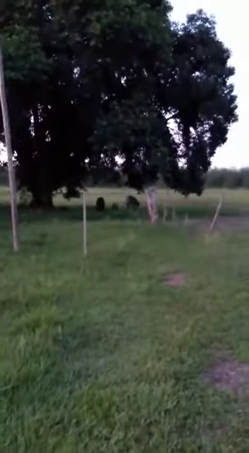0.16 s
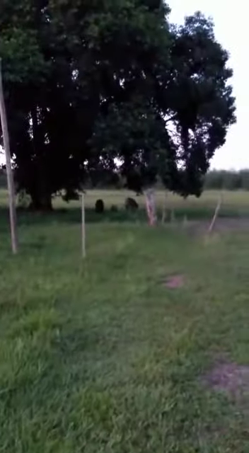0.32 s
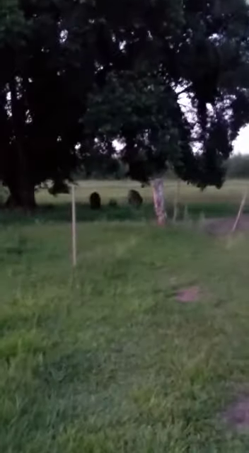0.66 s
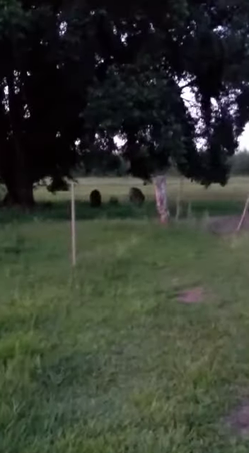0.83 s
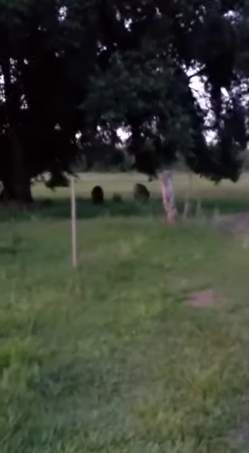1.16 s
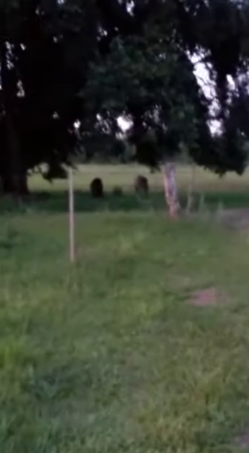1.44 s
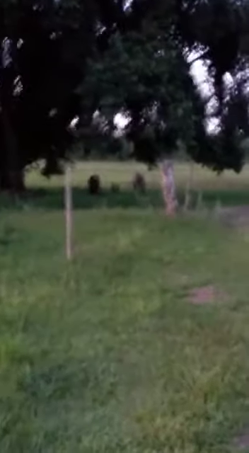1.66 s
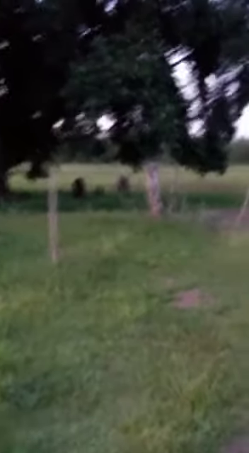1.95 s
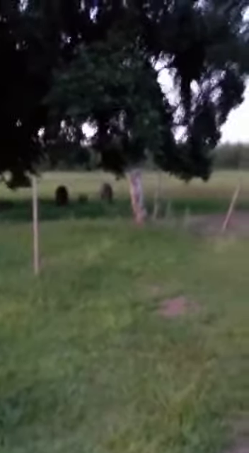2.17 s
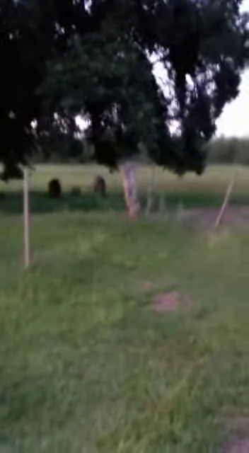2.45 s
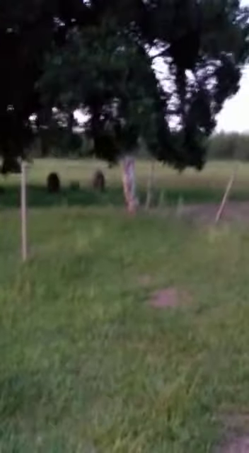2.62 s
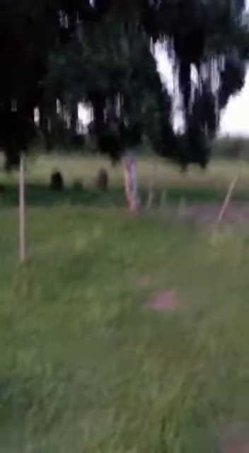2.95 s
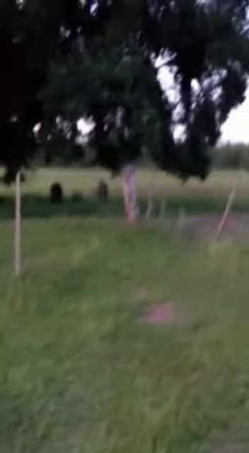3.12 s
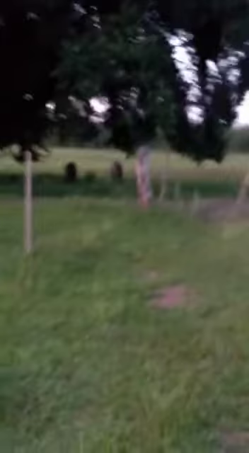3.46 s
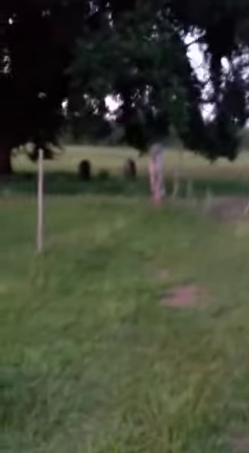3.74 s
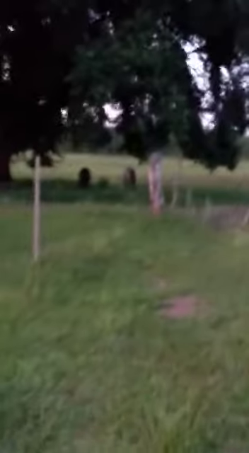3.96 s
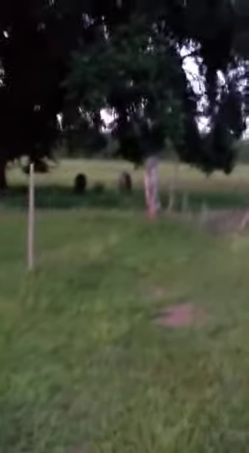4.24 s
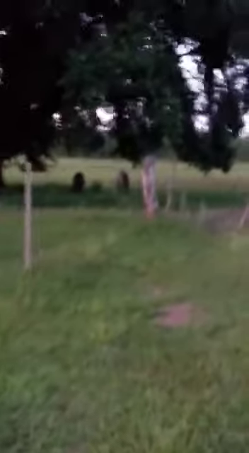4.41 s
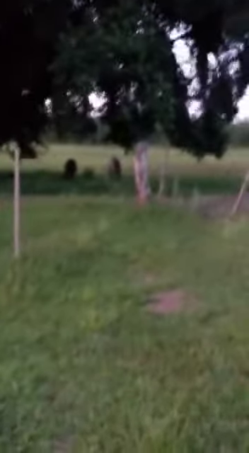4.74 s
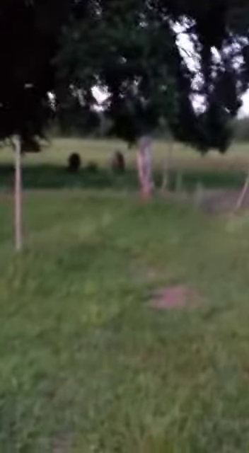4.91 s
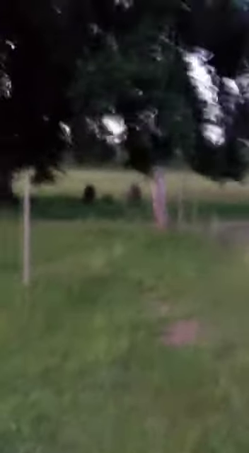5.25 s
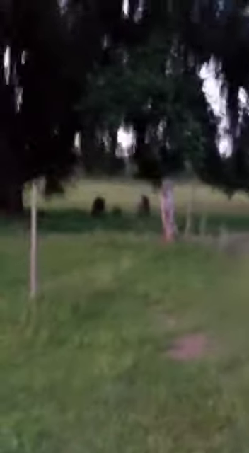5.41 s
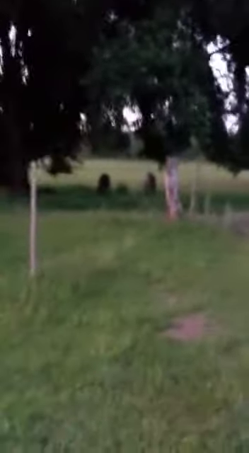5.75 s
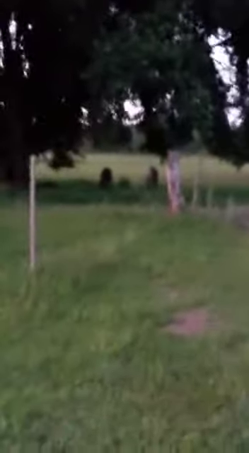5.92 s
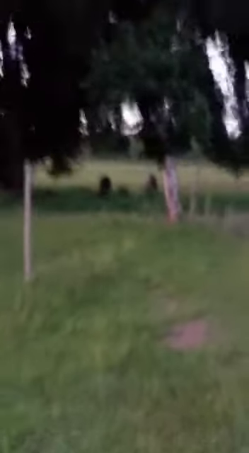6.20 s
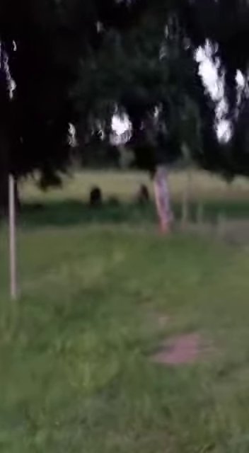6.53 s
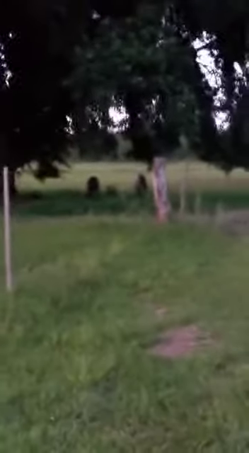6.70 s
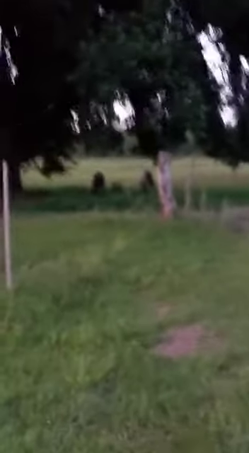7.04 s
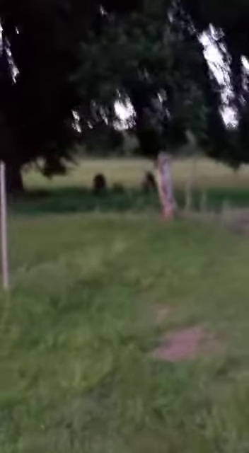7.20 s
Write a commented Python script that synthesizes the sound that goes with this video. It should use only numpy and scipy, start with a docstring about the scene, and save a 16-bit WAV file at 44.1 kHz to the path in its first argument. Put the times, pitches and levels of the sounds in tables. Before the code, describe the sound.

Many small birds in a large leafy tree chatter without pause, each note a very short, clear whistle sliding downward. Nearer chirps stand out at irregular moments over a faint blur of farther birds. Leaves smear the notes into brief airy tails. Beneath lie light hiss, a weak steady electronic whine on one side and a far engine's low, throbbing rumble. Outdoor pasture, handheld phone, wide stereo.

```python
"""Small birds in a big tree whistle quick falling notes over a pasture at dusk, with more birds further off.
Each note is a gliding near-sine; leaves scatter it as fading noise tails.
A far engine rumbles as throbbing resonant noise under a flickering hiss; the phone whines at a steady pitch.
The phone widens its two microphone ports by taking from each side a late copy of the other."""
import sys
import numpy as np
from scipy import signal
from scipy.fft import rfft, irfft, next_fast_len
from scipy.io import wavfile
from scipy.ndimage import uniform_filter1d

SR = 44100
rng = np.random.default_rng(int(sys.argv[2]) if len(sys.argv) > 2 else 0)


def inscribe(sig):
    """Save sig as 16-bit PCM at rate SR to the path in sys.argv[1].

    A 1-D sig is mono; a 2-D sig holds one channel per row.
    Samples are clipped to [-1, 1] before scaling.
    """
    pcm = np.round(np.clip(np.atleast_2d(sig).T, -1, 1) * 32767)
    wavfile.write(sys.argv[1], SR, pcm.astype(np.int16))


N = 325017
TIME_S = np.arange(N) / SR


def undb(db):
    """Gain of a level in dB."""
    return 10 ** (np.asarray(db) / 20)


def level(x, db):
    """Scale to an rms level in dB."""
    return x * undb(db) / np.sqrt(np.mean(x ** 2))


def walk(rate_hz):
    """Random levels held 1 / rate_hz and smoothed twice; spread near 1."""
    hold = int(SR / rate_hz)
    steps = np.repeat(rng.standard_normal(N // hold + 1), hold)
    smooth = uniform_filter1d(uniform_filter1d(steps, hold), hold)
    return 1.28 * smooth[:N]


def shape(x, gain):
    """Filter by a gain given as a function of Hz."""
    size = next_fast_len(N + SR)
    f = np.arange(size // 2 + 1) * SR / size + 1e-3
    return irfft(rfft(x, size) * gain(f), size)[..., :N]


def resonance(f, hz, width_hz):
    """Gain of a resonance, 1 at its centre."""
    return 1 / np.sqrt(1 + ((f - hz ** 2 / f) / width_hz) ** 2)


def whistles(notes):
    """Near-sine notes on curved glides; arrival lag and a lag-dependent level gap separate the two ports."""
    # strength of the voice by pitch, shared by all birds: (frequency [Hz], level [dB])
    voice = [(2000, 1), (2700, -7.5), (3300, -6.5), (3600, 1), (4100, -1), (4650, 1.4), (5100, -0.4),
             (5600, 3), (7000, -1.7), (9000, 1)]
    flutter_db, wobble_depth, edge_ms = 3, .003, 3.1
    peak_at, end_db = 0.46, -5  # level holds to this share of the note, then fades
    overtone_db = 6  # the overtone grows with the square of the note
    port_db, port_db_per_us = 2.2, -.005  # added at the first port, taken at the second

    out = np.zeros((2, N + SR))
    flutter = level(undb(flutter_db * walk(220)), 0)
    wobble = 1 + wobble_depth * walk(250)
    voice_hz, voice_db = np.transpose(voice)
    for start_s, length_ms, start_hz, end_hz, bend, db, lag_us in notes:
        first, count = int(start_s * SR), int(length_ms * SR / 1000)
        index = first + np.arange(count)
        u = np.arange(count) / count
        glide = np.expm1(-(bend + 1e-4) * u) / np.expm1(-bend - 1e-4)
        hz = start_hz + (end_hz - start_hz) * glide
        hz = hz * np.take(wobble, index, mode="wrap")

        edge = np.sin(np.pi / 2 * np.clip(np.minimum(u, 1 - u) * length_ms / edge_ms, 0, 1)) ** 2
        fade_db = np.interp(u, [peak_at, 1], [0, end_db])
        pitch_db = np.interp(np.log(hz), np.log(voice_hz), voice_db)
        gain = np.sqrt(2) * edge * undb(db + fade_db + pitch_db)
        gain = gain * np.take(flutter, index, mode="wrap")

        shade_db = port_db + port_db_per_us * lag_us
        for port, side in enumerate((1, -1)):
            phase = 2 * np.pi * (np.cumsum(hz) / SR - port * hz * lag_us / 1e6)
            tone = np.sin(phase) + undb(overtone_db) * gain * np.sin(2 * phase)
            out[port, first:first + count] += undb(side * shade_db) * gain * tone
    return out[:, :N]


def far_flock(count=750):
    """Many faint falling notes at random times, pitches and port lags; few are louder."""
    r = rng.random((count, 7)).T
    start_s = r[0] * N / SR
    length_ms = 45 + 55 * r[1]
    start_hz = 5310 + (7070 - 5310) * r[2]
    end_hz = 2758 + (5880 - 2758) * r[3]
    bend = 4 * r[4]
    db = -72 - 3.2 * np.log(r[5] + 0.06)
    lag_us = 500 * r[6]
    return np.transpose([start_s, length_ms, start_hz, end_hz, bend, db, lag_us])


def leaves(bird):
    """Dense scatter from the tree: fading noise tails, drawn once for each bird or far group and for each port."""
    # near twigs, whole crown: (time to fade 60 dB [s], tail level before the treble boost [dB])
    tails = [(0.091, -4), (.55, -8.5)]
    t, tail = np.arange(SR // 2) / SR, 0
    for t60_s, db in tails:
        part = rng.standard_normal((2, SR // 2)) * np.exp(-np.log(1000) * t / t60_s)
        tail = tail + part * undb(db) / np.sqrt(np.sum(part ** 2) / 2)
    return signal.oaconvolve(bird, tail, axes=1)[:, :N]


def leaf_treble(f):
    """Small leaves throw back high notes more strongly: gain rising around 6600 Hz towards 8 dB."""
    return undb(8 / (1 + (6600 / f) ** 8))


def engine():
    """Far engine: throbbing noise in a few low resonances, the two lowest swelling; weaker at the first port."""
    # swell of the deep drone: (time [s], level [dB])
    swell = [(0, -0.5), (.8, 1.5), (2.2, -1), (3.1, -2), (3.7, 2.5), (4.2, 4.5), (4.8, -1), (5.6, 2),
             (6.3, 0), (7.37, -1)]
    # resonances: (centre [Hz], width [Hz], relative level [dB])
    body_peaks = [(59.8, 36, 2.5), (121.3, 55, -2), (189, 12.5, -11.5), (285, 337, -13)]
    engine_db, first_port_db = -54, -6  # rms before the port difference; first port relative to second
    throb_hz, throb_db = 13, 3.5

    throb_rate_hz = throb_hz * (1 + 0.054 * walk(3.05))
    throb = undb(throb_db * np.sin(2 * np.pi * np.cumsum(throb_rate_hz) / SR))
    noise = throb * rng.standard_normal((2, N))

    def resonate(peaks):
        """Noise through parallel resonances."""
        return shape(noise, lambda f: sum(undb(db) * resonance(f, hz, width_hz) ** 2
                                          for hz, width_hz, db in peaks))

    deep, rest = resonate(body_peaks[:2]), resonate(body_peaks[2:])
    body = deep * undb(np.interp(TIME_S, *np.transpose(swell))) + rest
    return level(body, engine_db) * undb([[first_port_db], [0]])


def air():
    """Hiss of field and microphone, with a blur of insects and far birds; half-octave bands flicker alone."""
    # hiss spectrum: (frequency [Hz], relative level per Hz [dB])
    spectrum = [(100, -17.5), (700, -31.5), (1500, -33), (2000, -39), (2300, -32.5), (3500, -31),
                (5600, -48), (7000, -29.5), (8200, -43.5), (10000, -46.5), (13000, -41.5)]
    air_db, flicker_db = -60, 3
    hz, db = np.transpose(spectrum)
    out = 0
    for centre_hz in 40 * 2 ** np.arange(0, 9, .5):
        noise = rng.standard_normal((2, N))
        band = shape(noise, lambda f: np.exp(-(np.log2(f / centre_hz) / .4) ** 2))
        out = out + band * undb(flicker_db * walk(8.8))
    hiss = shape(out, lambda f: undb(np.interp(np.log(f), np.log(hz), db)))
    return level(hiss, air_db)


def whine():
    """The phone's own steady-pitched tone and its multiples, picked up by the second port only."""
    # multiples 1, 2, .. of the pitch: (mean level [dB])
    partials_db = [-60, -68.5, -84, -78, -78]
    whine_hz, drift_db = 500, 1.0
    tone = 0
    for multiple, db in enumerate(partials_db, 1):
        gain = np.sqrt(2) * undb(db + drift_db * walk(15))
        tone = tone + gain * np.sin(2 * np.pi * multiple * whine_hz * TIME_S)
    return np.array([0 * tone, tone])


def scene():
    """Birds, leaf scatter, engine, air and whine summed at the two ports."""
    # each bird: (lag at the second port [us], notes); each note: (start [s], length [ms], start pitch [Hz],
    # end pitch [Hz], bend of the glide [-], level before voice, flutter and port gains [dB])
    near_birds = [ (-20, [(.372, 17, 6960, 7450, -1, -44), (.39, 34.5, 7300, 4970, -1, -49),
                  (2.836, 30, 6470, 4920, 0.2, -52.5), (2.873, 30, 4550, 3440, -1.5, -53),
                  (3.451, 14, 8330, 7300, -1, -44.5), (4.915, 51, 7470, 3500, 0, -45.5),
                  (4.924, 12, 5530, 4500, -8, -56), (6.648, 24, 7670, 6140, 1.5, -47),
                  (6.69, 25, 7500, 6170, 3.5, -52), (6.835, 16.4, 7190, 6500, -6, -48.5)]),
                  (7, [(.712, 79, 4820, 2720, 0.8, -49), (.924, 8.5, 7800, 7000, 0.1, -57),
                  (1.042, 46, 5500, 2910, 0.5, -52.5), (1.136, 65, 4390, 2490, 1, -54.5),
                  (1.55, 43, 4290, 2720, 1.2, -53.5), (1.593, 53, 4470, 2790, 1, -59),
                  (1.96, 39, 8820, 6500, 0.4, -49.5), (2.113, 30, 7150, 6320, -0.5, -56.5),
                  (2.163, 55, 4460, 2790, 1.2, -57), (2.589, 75, 5900, 3150, 0.5, -45.5),
                  (2.796, 80.5, 5910, 2440, 0.5, -46), (3.05, 140, 3320, 3245, -2, -65),
                  (3.373, 41, 4800, 3330, -0.4, -53), (3.797, 21, 4880, 4250, 1, -47.5),
                  (3.82, 30, 4820, 3000, 0.5, -55), (3.848, 50, 4270, 2600, 2, -55.5),
                  (4.025, 82, 3290, 2700, -0.5, -57), (4.195, 23, 3440, 2450, 0, -62),
                  (4.262, 71, 4880, 2860, 0.1, -50.5), (4.372, 43, 6830, 4980, 1, -42.5),
                  (4.86, 40, 4520, 2780, -0.5, -54.5), (4.963, 59, 4860, 3000, 0, -50),
                  (5.065, 49, 6220, 4970, 2.5, -49), (5.202, 100, 6880, 2710, 1.3, -56.5),
                  (6.022, 95, 7150, 3070, 2.5, -53.5), (6.326, 50, 7000, 4900, 3.5, -45.5),
                  (6.7, 32, 3700, 2890, 2, -58.5), (6.73, 24, 6990, 6500, -10, -60),
                  (6.904, 59, 5580, 2890, 0.4, -50), (6.997, 21, 5280, 3310, 1, -48),
                  (7.001, 45, 6400, 4920, 3.5, -44.5)]), (12, [(.007, 50.6, 4950, 3010, 0.3, -46),
                  (.488, 16, 8200, 8260, 3, -45.5), (.497, 67, 8340, 5040, 3.5, -45.5),
                  (.597, 49, 4920, 3180, 0, -44.5), (1.021, 41, 4150, 2460, -0.5, -47),
                  (1.054, 47, 7480, 5300, 7.5, -50), (1.331, 49, 6900, 4870, 3, -45.5),
                  (1.467, 46, 4200, 2740, 0.8, -46.5), (1.876, 47, 6480, 4800, 1.5, -43.5),
                  (2.034, 31, 6690, 5400, 0.6, -42.5), (2.003, 48, 4600, 2510, 1.5, -47.5),
                  (2.723, 65, 9220, 5130, 6.5, -47.5), (3.249, 46, 7400, 5150, 2.5, -47.5),
                  (3.278, 13, 6960, 6900, 6, -47), (3.295, 19, 7340, 6240, -0.5, -41.5),
                  (3.725, 54, 8170, 5180, 3.5, -54.5), (3.76, 53, 8200, 5210, 11.5, -46.5),
                  (3.812, 24, 8100, 6420, 0.5, -45.5), (3.866, 83, 5970, 2960, 1, -46),
                  (3.99, 35, 6240, 6500, 2.5, -51), (4.018, 40, 6360, 4560, -0.5, -58),
                  (4.176, 59, 7500, 4820, 6.5, -50.5), (4.289, 64, 7870, 3300, 3.2, -54),
                  (4.323, 32, 8860, 10040, 1, -58), (4.344, 28, 9700, 6700, 3.5, -49),
                  (4.408, 36, 5330, 5030, 0, -47.5), (4.43, 45, 4970, 2860, -0.3, -46.5),
                  (4.451, 14.6, 6600, 5400, 0.6, -45.5), (4.658, 19, 8370, 5170, 3.5, -54),
                  (4.672, 34, 5230, 5380, 0, -46.5), (4.716, 38, 6390, 4810, 1.5, -47.5),
                  (5.218, 15, 6930, 7320, 1, -51), (5.29, 75, 5600, 2600, 0.7, -51.5),
                  (5.298, 65, 7350, 5230, 7.5, -43), (5.374, 71, 5220, 2800, -0.9, -45.5),
                  (5.679, 37, 6350, 4770, 2.5, -45), (6.122, 43, 7930, 5480, 8, -44.5),
                  (6.155, 22, 5460, 4850, 2.5, -51.5), (6.194, 60, 4860, 2500, 1, -44.5),
                  (6.5, 47, 6500, 4760, 2.5, -40.5), (6.588, 22, 9070, 6800, 1.5, -48.5),
                  (6.634, 38, 4340, 2490, 0, -47.5), (7.022, 26, 5500, 5170, -3, -46),
                  (7.104, 20, 8600, 9080, 4, -58), (7.116, 27, 8950, 6000, 1.5, -45),
                  (7.15, 27.5, 5950, 5525, 2.5, -42.5)]), (102, [(.368, 36, 6150, 5120, 2.5, -48.5),
                  (.265, 35, 4200, 2610, -1, -53), (.375, 43, 4880, 5370, -1.5, -47),
                  (.472, 47, 3910, 2575, 1, -52.5), (1.145, 26.5, 7030, 4660, -0.5, -53.5),
                  (1.184, 35, 4940, 3290, 2.5, -53), (1.714, 43, 8230, 5450, 2.5, -55),
                  (1.79, 30, 4600, 3360, 0.8, -54), (2.34, 31, 4800, 6400, 1, -55),
                  (2.37, 40, 6360, 4540, 1, -50.5), (2.426, 13.5, 7500, 9200, 2, -51),
                  (2.513, 87, 5680, 2360, 0.3, -48.5), (2.521, 14, 9530, 7640, -2.5, -52.5),
                  (2.536, 18, 8800, 7440, 2, -53), (2.986, 58, 5830, 2410, 1.5, -51.5),
                  (3.473, 81, 6020, 2560, 1, -53.5), (4.492, 36, 3940, 2590, 1, -42),
                  (4.747, 49, 4470, 2670, 1.5, -54), (4.81, 24, 7000, 5900, -1, -58),
                  (4.855, 16, 7050, 6560, 0, -56), (5.611, 37, 8100, 5200, 2.5, -50),
                  (6.237, 17, 7120, 5850, -0.5, -50.5), (6.751, 62, 5650, 2800, 1.5, -51),
                  (7.096, 28, 5640, 4920, 2.5, -43.5)]), (189, [(2.415, 45, 6950, 5420, -1.5, -45),
                  (3.11, 22.4, 9070, 6400, 1.5, -46.5), (3.242, 29, 5280, 5420, 9, -42),
                  (3.298, 39, 5270, 5670, 10, -48), (3.33, 32, 9430, 6060, 1.2, -47.5),
                  (3.366, 38, 5810, 5380, 3.5, -45.5), (4.976, 22.4, 7300, 5400, 5, -37),
                  (4.998, 20, 5440, 5680, 0.3, -40), (5.437, 38, 7560, 5390, 7, -45),
                  (5.714, 53, 7620, 5430, 6, -40)]), (238, [(1.838, 45, 6100, 4630, 2.5, -47),
                  (3.528, 68, 5460, 3020, 0.7, -52), (4.326, 31, 7370, 4460, 2.5, -47),
                  (4.381, 36, 4130, 3220, 1.5, -52.5), (5.015, 56, 5280, 3340, 0.5, -54),
                  (5.513, 44, 4330, 2450, -0.2, -53), (5.705, 16, 4010, 3200, 0.5, -56),
                  (5.732, 14, 7050, 5740, 1.5, -51), (5.948, 15, 6930, 5820, 1.5, -44),
                  (5.977, 15.6, 5070, 4630, 1.5, -43), (6.571, 35, 5470, 4790, 2, -44.5),
                  (7.188, 27, 7430, 3750, 0, -45), (7.225, 41, 4850, 3170, 1, -53),
                  (7.262, 42, 4000, 2550, 0.5, -54), (7.308, 34, 3720, 2840, 0.8, -62)]),
                  (305, [(1.256, 36, 7580, 5320, 3.5, -45), (1.503, 9.5, 7600, 6700, 1, -51),
                  (1.545, 42, 7300, 6270, 2, -45.5), (1.927, 14, 7500, 6200, 0.2, -43),
                  (2.024, 100.5, 5750, 2900, 0.15, -44), (2.443, 27, 9100, 6360, 2, -47.5),
                  (2.49, 12, 7400, 6750, 3, -51), (2.482, 14, 6300, 6130, 0, -42),
                  (2.514, 87.5, 6500, 2920, 0.3, -44.5), (5.788, 57, 4740, 2460, 1, -44.5),
                  (5.812, 34, 3700, 3436, 3, -46), (5.82, 27, 4160, 2550, -0.5, -50),
                  (5.835, 44, 4160, 2630, 2, -61), (7.22, 100, 2650, 1590, 0.5, -60)]),
                  (322, [(.19, 64, 4900, 2840, 0, -42.5), (.947, 50, 8440, 5580, 9.5, -45.5),
                  (.975, 61, 5010, 2930, 0.5, -47), (3.178, 31, 6200, 4350, 1.5, -47.5),
                  (3.208, 37, 4910, 2890, 0.9, -42.5), (3.847, 68, 6030, 2890, 0.5, -44.5),
                  (5.051, 45, 4640, 2700, 0.5, -45), (6.377, 40, 6540, 3600, 1.5, -47),
                  (6.413, 70, 5000, 2890, 0.6, -44.5)]), (453, [(.11, 40, 6940, 4896, 2.5, -39.5),
                  (.555, 26, 9900, 8990, 4, -52.5), (.618, 15, 7400, 6400, 2, -50),
                  (.647, 34.4, 5000, 5730, 0.9, -40.5), (.888, 51, 7270, 4880, 4.5, -41.5),
                  (1.42, 85, 9020, 4900, 4.5, -43.5), (3.088, 20, 7460, 8940, 7.5, -48),
                  (3.762, 53, 9090, 6100, -2, -48), (5.6, 103, 2120, 1680, 0.5, -65),
                  (7.155, 11.4, 7240, 6060, 2, -38.5)])]
    perches = [[(*note, lag_us) for note in notes] for lag_us, notes in near_birds]
    far_groups = np.split(far_flock(), 3)
    birds = [whistles(notes) for notes in perches + far_groups]
    scatter = shape(sum(leaves(bird) for bird in birds), leaf_treble)
    return sum(birds) + scatter + engine() + air() + whine()


def record(dry):
    """Phone widening: each side loses a late, dulled copy of the other; the extremes are then cut."""
    late_samples = 21
    cross_hz, cross_slope = 5100, 4.2
    bass_gain, bass_hz = .7, 250  # the late copy is weaker in the bass
    late = np.roll(dry[::-1], late_samples, axis=1)
    late = shape(late, lambda f: 1 - (1 - bass_gain) / (1 + (f / bass_hz) ** 2))
    wide = dry - shape(late, lambda f: 1 / (1 + (f / cross_hz) ** cross_slope))
    low_cut = signal.butter(2, 40, "high", fs=SR, output="sos")
    top_cut = signal.ellip(12, .2, 60, 14300, fs=SR, output="sos")
    return signal.sosfilt(np.vstack([low_cut, top_cut]), wide)


dry = scene()
out = record(dry)
inscribe(out)
```